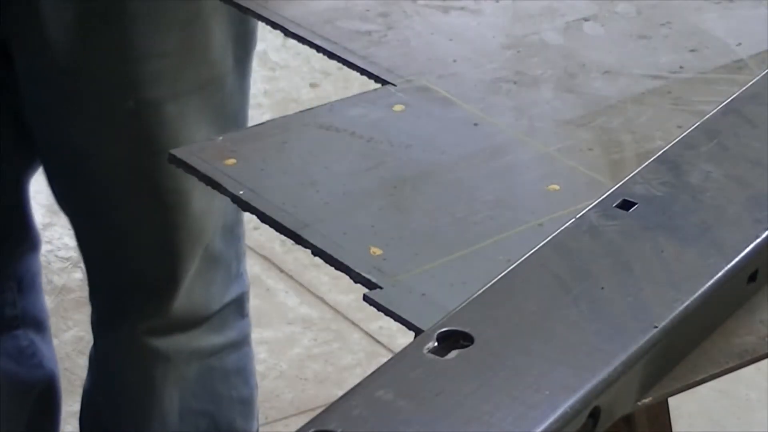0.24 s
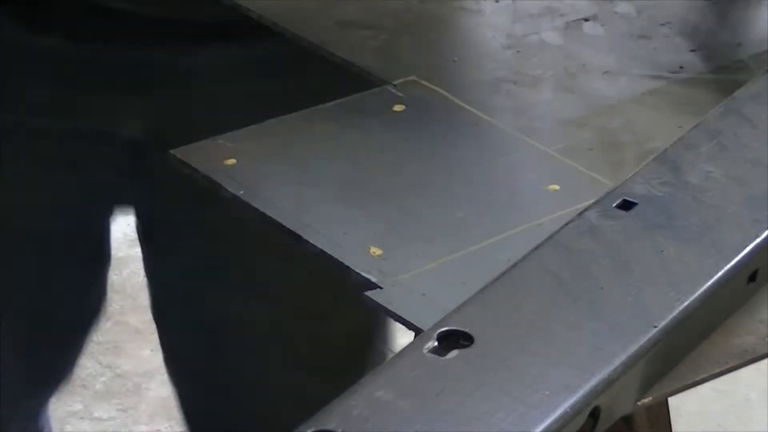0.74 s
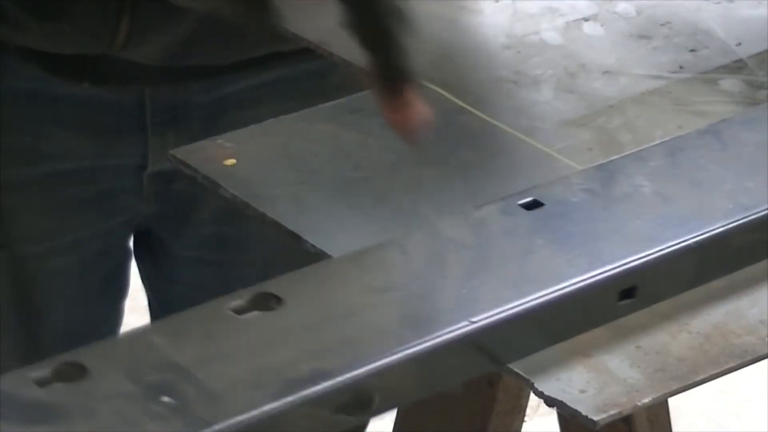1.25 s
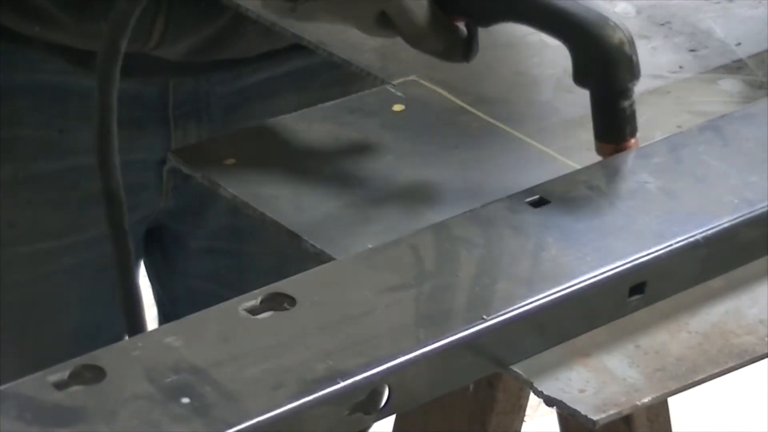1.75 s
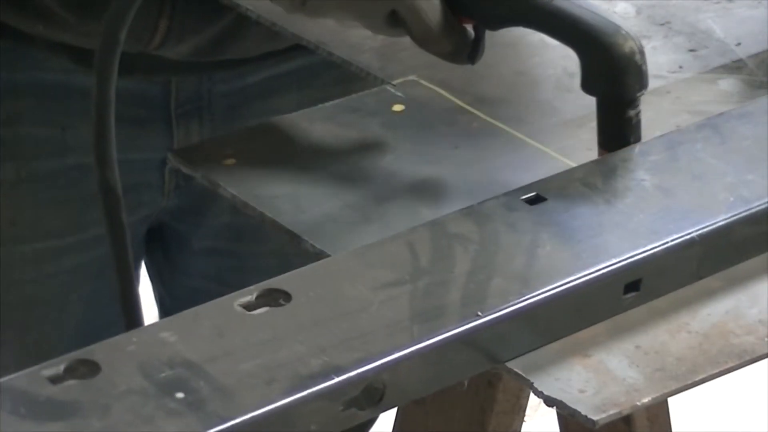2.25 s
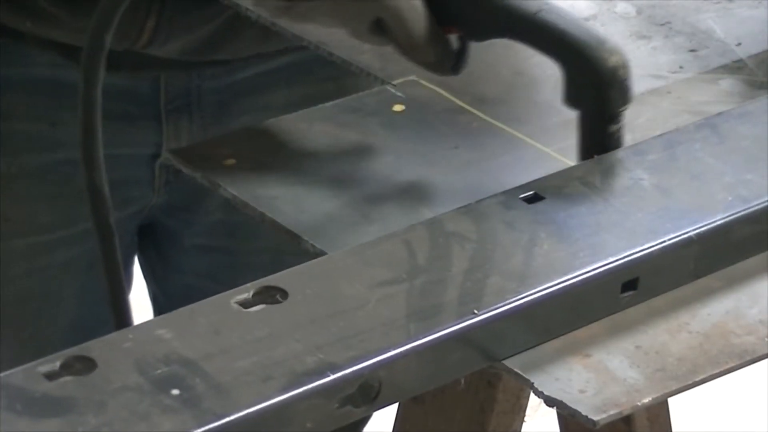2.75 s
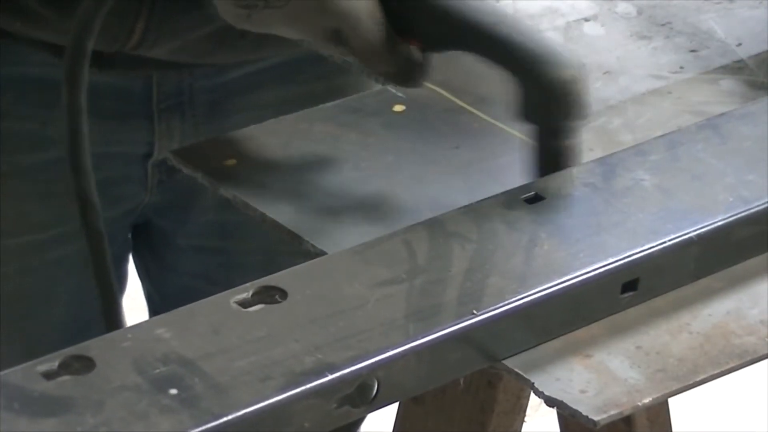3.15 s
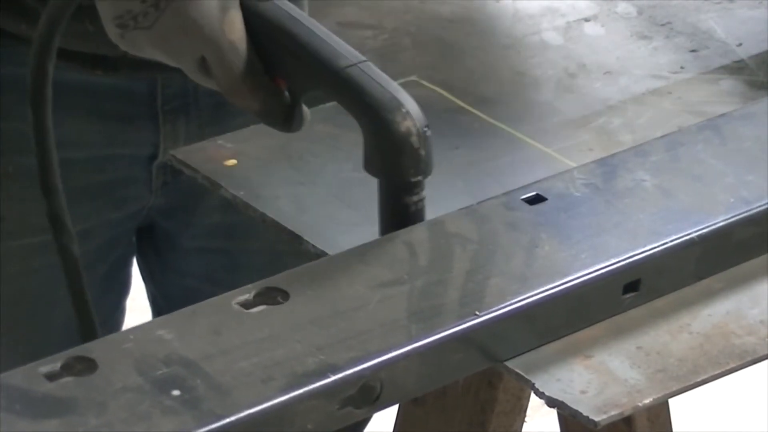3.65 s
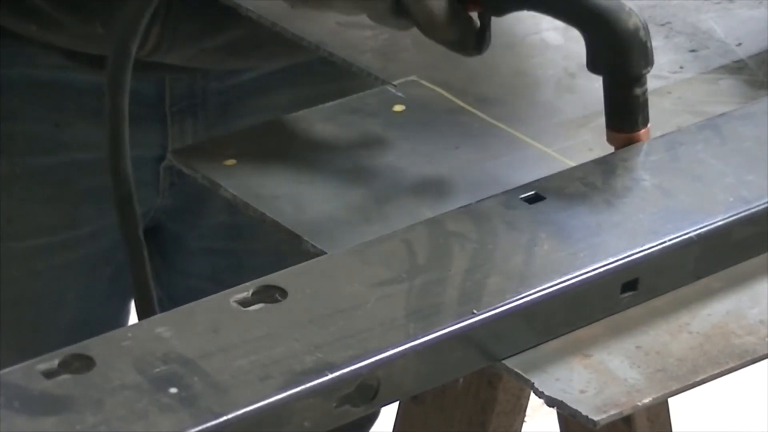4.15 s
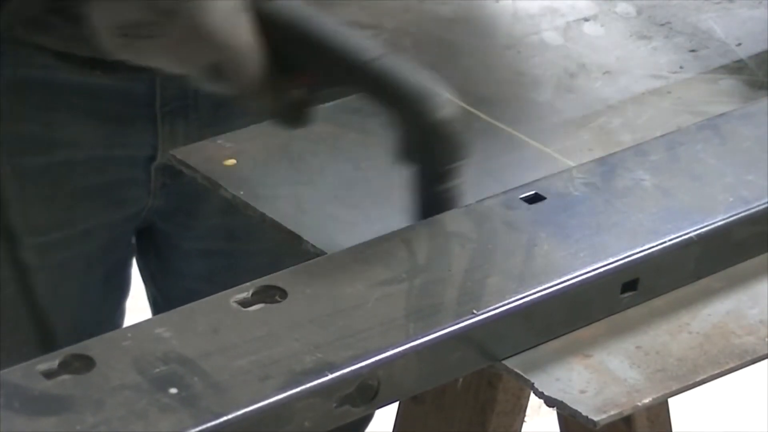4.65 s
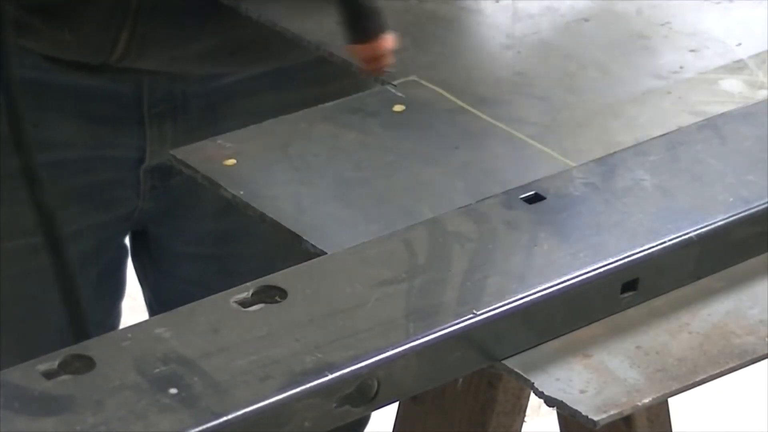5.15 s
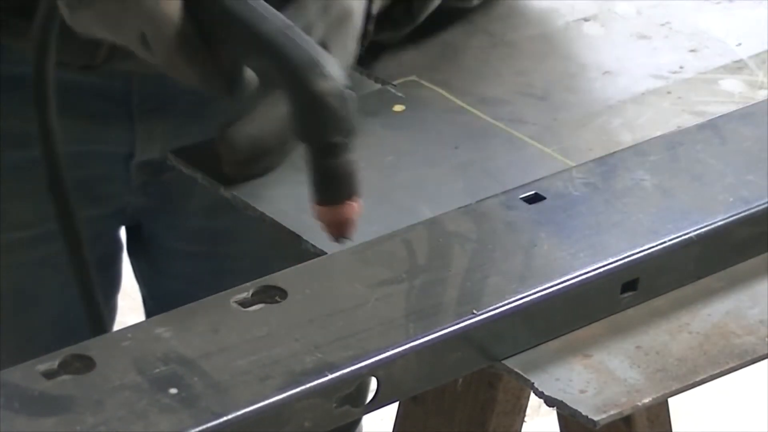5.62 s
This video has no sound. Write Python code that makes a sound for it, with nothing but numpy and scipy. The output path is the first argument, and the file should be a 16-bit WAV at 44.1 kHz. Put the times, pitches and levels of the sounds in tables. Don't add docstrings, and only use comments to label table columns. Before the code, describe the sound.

A strong, steady air hiss from a torch nozzle fills the first four seconds, heard close, with a short workshop reverberation. A steel bar clanks and grinds into place early on; the tip taps and lightly rubs it later. The air valve closes with a dull thump and the hiss dies quickly. A gritty metallic scrape with short squeals follows, then a knock, a faint lingering ring and small glove and metal ticks.

```python
import sys
import numpy as np
from scipy import signal
from scipy.fft import rfft, irfft, next_fast_len
from scipy.io import wavfile
from scipy.ndimage import uniform_filter1d, map_coordinates

SR = 44100
rng = np.random.default_rng(int(sys.argv[2]) if len(sys.argv) > 2 else 0)


def store_wav(level_fs):
    pcm = np.round(np.clip(np.atleast_2d(level_fs), -1, 1) * 32767)
    wavfile.write(sys.argv[1], SR, pcm.T.astype(np.int16))


def undo_db(level):
    steps = np.asarray(level, float) / 20
    return 10 ** steps


N = 259308
TIME_S = np.arange(N) / SR


def unit(x):
    return x / np.sqrt(np.mean(x ** 2) + 1e-20)


def along(points, hz):
    f, v = np.transpose(points)
    return np.interp(np.log(hz + 1), np.log(f + 1), v)


def gains(rows, before=-120):
    s, *columns = np.transpose(rows)
    return [undo_db(np.interp(TIME_S, s, db, before, -120)) for db in columns]


def swells(rows):
    return sum(undo_db(db - 20 * np.maximum((s - TIME_S) / rise, (TIME_S - s) / fall))
               for s, db, rise, fall in rows)


def wobble(rate):
    knots = rng.standard_normal(int(N * rate / SR) + 4)
    return map_coordinates(knots, [np.arange(N) * rate / SR])


def filtered(x, response):
    m = next_fast_len(N + SR // 2)
    return irfft(rfft(x, m) * response(np.fft.rfftfreq(m, 1 / SR)), m)[..., :N]


def resonance(f, centre, width, db):
    return undo_db(db) * 1j * f * width / (centre * centre - f * f + 1j * f * width)


def modes(table):
    return lambda f: sum((-1) ** k * resonance(f, *mode) for k, mode in enumerate(table))


def wavering(table, swell_db, rate):
    total = 0
    for hz, width, db in table:
        level = np.sqrt(width) * undo_db(db + swell_db * wobble(rate))
        total = total + level * np.sin(2 * np.pi * hz * TIME_S + 0.94 * wobble(width))
    return unit(total)


# (time [s], echo delay [ms], nearness to the microphone [dB])
TORCH_HEIGHT = [(0, 0.67, -1), (.9, 0.397, 0.5), (1.15, 0.3358, 1.5), (1.27, 0.21356, -1),
                (1.37, 0.1624, 1), (1.41, 0.112, 0), (1.5, .108, .7), (1.63, 0.105, .3),
                (1.84, 0.103, -1.5), (1.87, 0.081, -0.5), (2.65, 0.05237, 0.5), (3.19, 0.032, 0.5),
                (3.25, 0.08716, -0.5), (3.31, 0.06108, 0.5), (3.77, 0.05403, 0.5), (3.81, 0.09, 1),
                (3.845, 0.1097, 0.5), (3.88, 0.12139, 0.5), (3.97, 0.10989, 0), (4.25, 0.10157, -1)]


def delay_ms(t):
    s, ms, _ = np.transpose(TORCH_HEIGHT)
    return np.interp(t, s, np.maximum(ms, .02))


# (echo delay [ms], share [0-1])
IMAGE_SHARE = [(.06, 0), (.085, 0.19), (.12, .35), (.2, 0.6), (.35, .35), (.46, .05)]
ROUGHNESS_HZ = 26020


def rush(spectrum, alike, patchy_db, mirror=0):
    hz, t, z = signal.stft(rng.standard_normal((2, N)), SR, nperseg=512)
    field = uniform_filter1d(rng.standard_normal(z.shape[1:]), 5, 0)
    field = uniform_filter1d(field, 10, 1)
    late_ms = delay_ms(t)
    share = mirror * np.clip(np.interp(late_ms, *np.transpose(IMAGE_SHARE)), 0, 1)
    share = share * np.exp(-(hz[:, None] / ROUGHNESS_HZ) ** 2)
    comb = np.abs(1 + share * np.exp(2j * np.pi * hz[:, None] * late_ms / 1000))
    comb = comb / np.sqrt(1 + share ** 2)
    pair = signal.istft(z * comb * undo_db(patchy_db * unit(field)), nperseg=512)[1][:, :N]

    def mid_side(f):
        turn = np.arctan(undo_db(along(alike, f)))
        return undo_db(along(spectrum, f)) * [np.cos(turn), np.sin(turn)]

    mid, side = filtered(pair, mid_side)
    return unit(np.array([mid + side, mid - side]))


VALVE_SHUTS_S = 4.2324
VALVE_T60_S = (0.16, .12, 0.3852, 0.8596)

# (frequency [Hz], side minus mid [dB])
FAR_WIDTH = [(40, -8), (150, -11.5), (400, -20.5), (1000, -10.5), (4000, -6.5), (7500, -16), (10000, -34.5),
             (15000, -39)]
# (frequency [Hz], density [dB per Hz])
RUMBLE_SPECTRUM = [(65, -38.5), (110, -18.5), (226, -10), (338, -5), (400, -1.5), (509, -4.5), (560, -26.5),
                   (730, -60), (1230, -120)]
# (frequency [Hz], density [dB per Hz])
ROOM_SPECTRUM = [(380, -32), (650, -1.5), (723, -13), (804, -8), (1880, -13.5), (2040, -13.5), (9640, -25),
                 (12500, -29), (15600, -31)]
# (frequency [Hz], density [dB per Hz])
HUM_SPECTRUM = [(13, -36), (22, -15), (54, -1.5), (130, 1.5), (170, -22), (290, -120)]
# (time [s], level [dB])
ROOM_LEVEL = [(4.95, -63), (4.986, -63), (5.216, -64), (5.88, -63)]
# (peak time [s], level [dB], rise [s], fall [s per 20 dB])
STIR_SWELLS = [
    (0, -53, .1, .6),
    (.97, -41, .15, 1.1),
    (2.14, -52, .03, .2),
    (2.7, -52, .08, .6),
    (3.46, -52, .4, .5),
    (4.24, -51, .1, .6),
    (4.81, -46, .06, .2),
    (5.25, -64, .2, .5),
    (5.7, -57.5, .22, .3),
]
BENCH_BLOWN_DB, BENCH_STILL_DB = -61, -71


def shop():
    since_shut = np.maximum(TIME_S - VALVE_SHUTS_S, 0)
    blown = undo_db(BENCH_BLOWN_DB - 60 * since_shut / VALVE_T60_S[-1])
    stirred = undo_db(BENCH_STILL_DB) + blown + swells(STIR_SWELLS)
    rumble = stirred * undo_db(0.59 * wobble(30)) * rush(RUMBLE_SPECTRUM, FAR_WIDTH, patchy_db=3.0)
    air = gains(ROOM_LEVEL, before=-66.0)[0] * rush(ROOM_SPECTRUM, FAR_WIDTH, patchy_db=1.0)
    return rumble + air + undo_db(-70.5) * rush(HUM_SPECTRUM, FAR_WIDTH, patchy_db=3.0)


# (frequency [Hz], t60 [s])
WALL_T60 = [(150, 0.25), (1000, 0.59503), (4000, 0.43), (12000, 0.21)]


def walls(x):
    hz, t, z = signal.stft(rng.standard_normal((2, SR // 2)), SR, nperseg=256)
    tail = signal.istft(z * undo_db(-60 * t / along(WALL_T60, hz)[:, None]), SR, nperseg=256)[1]
    tail = tail[0] + np.array([[.06], [-.06]]) * tail[1]
    late = np.pad(x, (300, 0))[None]
    return signal.fftconvolve(late, tail / np.linalg.norm(tail[0]), axes=1)[:, :N]


BAR_HZ = (606, 753)

# (time [s], level [dB])
SINGING_LEVEL = [
    (4.85, -62),
    (5.0, -59.5),
    (5.25, -63),
    (5.5, -64.5),
    (5.62, -67),
    (5.88, -70.5),
]


def singing():
    return gains(SINGING_LEVEL)[0] * np.sqrt(2) * np.sin(2 * np.pi * BAR_HZ[0] * TIME_S)


# (time [s], peak [dB], frequency [Hz], t60 [s], rustle share [0-1])
SMALL_CONTACTS = [(4.752, -33, 4337, 0.0557, .8), (4.775, -41.5, 7180, 0.092, 0.32),
                  (4.85, -49, 10020, .015, .6), (5.17, -46, 2200, .03, 0.73), (5.209, -44, 1702, 0.053, .2),
                  (5.209, -46, 968.6, 0.04187, 0.27), (5.228, -53, 1947, 0.0403, 0.38),
                  (5.374, -58.5, 1850, 0.041, .5), (5.474, -43, 6548, 0.01198, 0.47),
                  (5.474, -46, 4186, .012, .9), (5.583, -49, 2380, 0.04163, .8),
                  (5.59, -57.5, 5000, 0.0565, .9), (5.6, -51, 3154, 0.05034, 0.68),
                  (5.605, -65, 6051, .15, .3), (5.671, -53, 1605, .033, 0.78), (5.858, -52, 1100, .05, .9),
                  (5.865, -45, 929.9, .08, 0.27), (5.862, -47, 1397, .09, .6),
                  (5.862, -50, 2314, 0.0694, 0.37)]


def ticks():
    out, t = np.zeros(N + SR), np.arange(SR // 8) / SR
    for s, db, hz, t60, rustle in SMALL_CONTACTS:
        drift = unit(uniform_filter1d(rng.standard_normal(len(t)), size=32))
        ring = np.sin(2 * np.pi * hz * t + 0.005 * np.cumsum(drift))
        band = signal.butter(4, [hz / 2, hz * 1.35], "bandpass", fs=SR, output="sos")
        noise = unit(signal.sosfilt(band, rng.standard_normal(len(t))))
        snap = (1 - rustle) * ring + rustle * noise
        decay = undo_db(db - 60 * t / max(t60, .003))
        out[round(s * SR):][:len(t)] += decay * snap * (1 - np.exp(-t * hz / 7))
    return out[:N]


# (time [s], thud [dB], clack [dB])
BLOWS = [
    (.914, -28.5, -19),
    (1.349, -58, -41),
    (2.119, -41, -28.5),
    (2.633, -39.5, -26.5),
    (4.221, -27.5, -38),
    (4.239, -40, -36),
    (4.328, -35, -18),
    (4.755, -44.5, -28.5),
    (4.77, -41.5, -26.5),
]
# (time [s], peak [dB], frequency [Hz], t60 [s])
BLOW_RINGS = [(4.218, -38.5, 110, 0.063), (.865, -36, 458, 0.17), (.914, -16, 751, 0.059),
              (1.17, -33, 606, 0.18), (1.349, -27.5, 2130, .09), (2.117, -23, 435.5, 0.07),
              (2.633, -31.5, 360, .06), (2.64, -32.5, 1360, 0.05), (2.632, -30, 820, 0.05),
              (4.221, -14.5, 228.62, 0.033686), (4.233, -19.5, 320, 0.023), (4.241, -24.5, 2795, 0.11),
              (4.265, -31.5, 430, .12), (4.336, -34, 1700, .12), (4.338, -32, 1200, .2),
              (4.326, -23, 880, 0.0451), (4.335, -31, 2073, 0.089904), (4, -36, 2293, 0.1033),
              (4.335, -28, 480, 0.08394), (2.13, -36, 350, 0.15), (2.165, -34.5, 440, .1),
              (2.14, -47.5, 105, .25), (2.125, -35.5, 770, .15), (4.755, -24, 2820, 0.074),
              (4.77, -23, 1150, 0.07284)]
SLAP, SLAP_HZ = (4.336, -19, .016, .014), 1450


def knocks():
    out, t = np.zeros(N + SR), np.arange(SR // 4) / SR
    dull = signal.butter(3, [110, 610], "bandpass", fs=SR, output="sos")
    bright = signal.butter(3, [800, 2370], "bandpass", fs=SR, output="sos")
    onset = 1 - np.exp(-t / 0.0056)
    for s, thud_db, clack_db in BLOWS:
        thud = unit(signal.sosfilt(dull, rng.standard_normal(len(t))))
        thud = undo_db(thud_db - 1.5 - 60 * t / 0.13) * thud
        clack = signal.sosfilt(bright, rng.standard_normal(len(t)))
        clack = undo_db(clack_db + 14 - 60 * t / 0.065) * clack
        out[round(s * SR):][:len(t)] += (thud + clack) * onset
    for s, db, hz, t60 in BLOW_RINGS:
        drift = unit(uniform_filter1d(rng.standard_normal(len(t)), size=48))
        waver = np.cumsum(drift) * 0.0003 * np.sqrt(hz)
        decay = undo_db(db + 3.0 - 60 * t / max(t60, .01))
        out[round(s * SR):][:len(t)] += decay * np.sin(2 * np.pi * hz * t + waver) * onset
    return out[:N] + swells([SLAP]) * np.sin(2 * np.pi * SLAP_HZ * TIME_S)


# (time [s], mode [Hz], level [dB])
SQUEAL_MODES = [
    (4.48, 2600, -39),
    (4.521, 2600, -26.5),
    (4.58, 2600, -35),
    (4.635, 2600, -29.5),
    (4.66, 2290, -42),
    (4.7, 2290, -29),
    (4.75, 2290, -39.5),
    (4.8, 2290, -31.5),
    (4.87, 2290, -37.5),
    (4.92, 2290, -61),
]


def squeal():
    s, hz, db = np.transpose(SQUEAL_MODES)
    mode_hz = hz[np.clip(np.searchsorted(s, TIME_S), 0, len(s) - 1)]
    level = gains(np.transpose([s, db]))[0] * undo_db(-12 + 2.5 * wobble(70))
    return level * np.sin(2 * np.pi * np.cumsum(mode_hz) / SR + .9 * wobble(55))


# (peak time [s], level [dB],
# frequency [Hz], peak to 20 dB down [s])
MODE_CATCHES = [(3.36, -40.5, 2276, -0.0069), (3.45, -41.5, 1359, -0.0278), (3.505, -40, 2290, 0.0521),
                (3.6, -41, 1360, 0.0859), (3.69, -39.5, 1218, 0.1322), (3.75, -43, 1159, -0.0933),
                (3.8, -38.5, 1370, 0.0622), (3.87, -34.5, 2678, 0.051), (3.89, -33, 2089, 0.0251),
                (3.9, -41, 1676, -0.0133), (4.46, -51, 3862, 0.0565), (4.49, -57.5, 8480, 0.0126),
                (4.53, -48, 5660, 0.0706), (4.61, -49.5, 5662, 0.0418), (4.55, -52.5, 4169, 0.0651),
                (4.55, -51.5, 7200, 0.0508), (4.78, -53, 4170, 0.0504), (4.8, -55.5, 5820, 0.0405),
                (.93, -27.5, 1376, 0.0439), (.95, -29, 1019, 0.037), (.937, -28, 2600, .02),
                (.925, -30, 3690, .02), (1.09, -31, 1565, .04), (1.1, -32, 1290, .05),
                (.96, -31, 1560, .04), (.93, -32, 3490, 0.0015), (.97, -33.5, 2780, 0.0008),
                (.99, -31, 1330, 0.0506)]


def catches():
    total = 0
    for s, db, hz, span in MODE_CATCHES:
        level = undo_db(db - 20 * ((TIME_S - s) / span) ** 2 + 2.5 * wobble(90))
        total = total + level * np.sin(2 * np.pi * hz * TIME_S + .9 * wobble(60))
    return total


# (peak time [s], level [dB], rise [s], fall [s per 20 dB])
RAIL_SWELLS = [
    (4.39, -34, 0.073, 0.0639),
    (4.782, -26.5, 0.03189, 0.0859),
]
DRAG_START_S, DRAG_ATTACK_S, DRAG_END_S, DRAG_DB = 4.44, .085, 4.74, -33.5
SAG_DB_PER_S = 17.5
RAIL_T60_S, EDGE_T60_S = 0.467, 0.16
EDGE_DB, EDGE_JERK_DB = -3.5, -11


def drags():
    sag = SAG_DB_PER_S * np.maximum(TIME_S - DRAG_START_S - DRAG_ATTACK_S, 0)
    stroke = undo_db(DRAG_DB - sag) * np.clip((TIME_S - DRAG_START_S) / DRAG_ATTACK_S, 0, 1)
    since_end = np.maximum(TIME_S - DRAG_END_S, 0)
    low = stroke * undo_db(-60 * since_end / RAIL_T60_S) + swells(RAIL_SWELLS)
    high = undo_db(EDGE_DB) * stroke * undo_db(-60 * since_end / EDGE_T60_S)
    return low, high + undo_db(EDGE_JERK_DB) * swells(RAIL_SWELLS[1:])


# (frequency [Hz], width [Hz], level [dB])
RAIL_MODES = [(460.34, 110, -1), (1152.3, 52, -8.5), (1370, 15, 2), (1635.9, 40, 5), (1770, 42, -5),
              (1999, 15, -10), (2150, 48, -7), (2302.9, 66, 8), (2590, 50, -3), (2890, 27, -3),
              (2792, 19, -5.5)]
# (frequency [Hz], width [Hz], level [dB])
EDGE_MODES = [(3466.3, 52, 0), (4170, 60, -0.5), (4469.5, 44, -7), (5500, 60, -14), (5650, 37, 0),
              (6324, 31.1, -15.5), (6670, 100, -8.5), (7190, 37, -1), (7400, 40, -2.5), (7585, 18, -6),
              (7908, 18, -5), (8243, 37, -11.5), (8480, 29, -19.5), (9070, 41, -21)]
# (frequency [Hz], width [Hz], level [dB])
GUIDE_MODES = [(1250, 200, -2), (1640, 120, -10), (2160, 43, 0.5)]
# (frequency [Hz], density [dB per Hz])
RAIL_RUB = [(88, -55), (150, -27.5), (467, 2.5), (792, -1.5), (1140, -1), (2010, -2), (2300, -4.5),
            (3800, -28.5), (4940, -38), (8360, -120)]
# (frequency [Hz], density [dB per Hz])
EDGE_RUB = [(1760, -29), (3000, -0.5), (3920, -13), (4320, -9.5), (4850, -12), (7330, -14.5), (10000, -25),
            (12500, -36), (15500, -48)]
# (time [s], level [dB])
TRACE_LEVEL = [
    (3.25, -55.5),
    (3.45, -39),
    (3.6, -39),
    (3.75, -41.5),
    (3.9, -42),
    (4.02, -53),
]


def drag():
    low, high = drags()
    grit = rng.standard_normal(N) * undo_db(0.66 * wobble(70) + 2.2 * wobble(400))
    rail_rub = unit(filtered(grit, lambda f: undo_db(along(RAIL_RUB, f))))
    edge_rub = unit(filtered(grit, lambda f: undo_db(along(EDGE_RUB, f))))
    rail = .45 * wavering(RAIL_MODES, swell_db=4, rate=22) + rail_rub
    edge = .6 * wavering(EDGE_MODES, swell_db=4.5, rate=25) + edge_rub
    trace = gains(TRACE_LEVEL)[0] * unit(filtered(grit, modes(GUIDE_MODES)))
    return undo_db(-3) * low * rail + undo_db(-5.0) * high * edge + trace + squeal() + catches()


# (time [s], push [dB], lean toward the first mode [dB])
SHOVE_PUSH = [
    (0.907, -37.5, -13.5),
    (.945, -17, -22),
    (.96, -17, -14),
    (0.978, -17.5, -0.5),
    (1.013, -15.5, 6),
    (1.024, -33.5, 2),
    (1.037, -15, 11.5),
    (1.085, -26, -10),
    (1.114, -26, 0.5),
    (1.135, -45, 6),
]
SHOVE_T60_S = .2


def shove():
    s, db, lean = np.transpose(SHOVE_PUSH)
    push = np.interp(TIME_S, s, db, -120) - 60 * np.maximum(TIME_S - s[-1], 0) / SHOVE_T60_S
    return push, np.interp(TIME_S, s, lean)


# (peak time [s], level [dB], rise [s], fall [s per 20 dB])
JOLT_SWELL = [
    (.93, -21, .015, 0.082),
]
# (frequency [Hz], width [Hz], level [dB])
MIDDLE_MODES = [(936.63, 20, -4.5), (1025.1, 32, -0.5), (1170, 18, -10.5), (1285.7, 20, -1),
                (1376, 38, -2.5), (1527.2, 21, -13.5), (1567, 24, -3)]
# (frequency [Hz], width [Hz], level [dB])
UPPER_MODES = [(1885.5, 20, -9.5), (2099.5, 30, -5.5), (2210, 29, -1.5), (2330, 16, -9), (2455, 26, -8),
               (2600, 40, -4), (2780, 29, -2), (3010, 22, -6), (3270, 19, -5), (3490, 32, -3),
               (3690, 50, -9)]
# (frequency [Hz], level [dB], t60 [s])
FREE_MODES = [(821.53, -2, 0.4944), (953, -4, 0.5802), (1053, -11, 0.599), (1320, -7, 0.634),
              (1405, -5.5, 0.2663), (1755, -7, 0.337), (2017.3, -10, .27), (2290, -8, 0.5747),
              (2780, -11.5, 0.494), (3018.3, -2, 0.266), (3277, -15.5, .45), (3494, -13.5, 0.4676),
              (3667, -16, 0.302), (4172, -17, 0.2416)]
RELEASED_S, RELEASED_DB = 4.757, -33.5
RATTLE_FOLLOWS, MIDDLE_DB, UPPER_DB = 0.62, -13.5, -17.5
DULLS_DB_PER_S = 75.5


def bar():
    push, lean = shove()
    first, second = undo_db(push + np.minimum(lean, 0)), undo_db(push - np.maximum(lean, 0))
    jolt = swells(JOLT_SWELL)
    middle = undo_db(RATTLE_FOLLOWS * push + MIDDLE_DB) + jolt
    upper = undo_db(RATTLE_FOLLOWS * push + UPPER_DB) + jolt
    upper = upper * undo_db(-DULLS_DB_PER_S * np.maximum(TIME_S - JOLT_SWELL[0][0], 0))
    low, high = (np.sqrt(2) * np.sin(2 * np.pi * hz * TIME_S + .7 * wobble(40)) for hz in BAR_HZ)
    grind = rng.standard_normal(N) * undo_db(3 * wobble(90))
    grind = filtered(grind, lambda f: modes([(1100, 2200, 0)])(f) ** 2)
    chatter = rng.standard_normal(N) * undo_db(2.8 * wobble(90))
    chatter = filtered(chatter, lambda f: modes([(2500, 2600, 0)])(f) ** 2)
    rattle = middle * (wavering(MIDDLE_MODES, swell_db=2.5, rate=30) + .5 * unit(grind))
    rattle = rattle + upper * (wavering(UPPER_MODES, swell_db=1.5, rate=32) + 0.29 * unit(chatter))
    since = np.maximum(TIME_S - RELEASED_S, 0)
    free = sum(undo_db(RELEASED_DB + db - 60 * since / t60) * np.sin(2 * np.pi * hz * since)
               for hz, db, t60 in FREE_MODES)
    free = free * (1 - np.exp(-since / 0.01028))
    return first * low + second * high + undo_db(-3.0) * rattle + free


# (crest frequency [Hz], level [dB])
WHISTLE_LEVEL = [(7000, -51), (8500, -26), (9500, -23), (10500, -32.5), (12500, -42), (15000, -55)]
WHISTLE_WIDTH = 0.075


def whistle():
    hz, t, z = signal.stft(rng.standard_normal(N), SR, nperseg=512)
    centre_hz = np.minimum(1000 / delay_ms(t), 19000)
    crest = np.exp(-.5 * ((hz[:, None] / centre_hz - 1) / WHISTLE_WIDTH) ** 2)
    level = undo_db(along([(5000, -120)] + WHISTLE_LEVEL, centre_hz))
    crest = crest / np.sqrt(np.mean(crest ** 2, axis=0)) * level
    return signal.istft(z * crest, nperseg=512)[1][:N]


# (frequency [Hz], density [dB per Hz])
HISS_SPECTRUM = [(5000, -41.5), (7000, -6.5), (7700, -2), (8300, -0.5), (9300, 0), (10200, -4.5),
                 (11500, -16), (13000, -17)]
# (frequency [Hz], density [dB per Hz])
FIZZ_SPECTRUM = [(9000, -40.5), (10500, 1.5), (12000, 3.5), (13300, -2), (14000, -9.5), (15800, -11.5),
                 (16500, -29.5)]
# (frequency [Hz], density [dB per Hz])
WASH_TRAPPED = [(1180, -36), (2000, -15), (3450, -3), (3720, -6), (4490, -1.5), (5030, -3), (5640, 0),
                (6390, -6), (7800, -9), (10100, -32), (17200, -120)]
# (frequency [Hz], density [dB per Hz])
WASH_SPREAD = [(1180, -27), (2000, -6), (2290, -8.5), (3170, 0), (3810, -4.5), (4390, -0.5), (5000, -1.5),
               (5610, 0.5), (7200, -5.5), (7800, 1.5), (10100, -31), (17200, -120)]
# (frequency [Hz], density [dB per Hz])
ROAR_SPECTRUM = [(210, -51.5), (350, -22.5), (546, -11.5), (604, -14), (688, -12.5), (943, -12.5),
                 (1380, -6.5), (2290, -5.5), (3200, -8.5), (4160, -24), (7040, -120)]
# (frequency [Hz], side minus mid [dB])
NEAR_WIDTH = [(60, -7), (250, -17), (500, -29.5), (1100, -39.5), (2500, -36.5), (3800, -19), (5000, -25),
              (8000, -18.5), (10500, -24.5), (14000, -19)]
# (time [s], side gain [dB])
TREBLE_WIDTH = [
    (0, 3),
    (.85, 3.5),
    (1.2, -4.5),
    (4.2, -5.5),
    (4.3, 10.5),
]
# (echo delay [ms], hiss [dB], fizz [dB], wash [dB], roar [dB])
HEIGHT_LEVELS = [(.045, -23.5, -40, -24, -36), (.08, -25, -27.5, -24, -35.5),
                 (0.106, -30.5, -28.5, -25.5, -37), (.114, -25, -32, -25.5, -34), (.2, -22, -29, -27, -33),
                 (.45, -25, -36, -26, -38.5)]
TRAPPED_MS, LEAST_TRAPPED = (.101, .107), 0.3
ROAR_SHOVE_DB, ROAR_TRACE_DB = -8.5, 2
GASP_RISE_S, GASP_WASH_DB, GASP_ROAR_DB = 0.018, 3.3, 11.075


def jet():
    height = delay_ms(TIME_S)
    landed = np.clip(np.interp(height, TRAPPED_MS, [1, LEAST_TRAPPED]), 0, 1)
    near_db = np.interp(TIME_S, *np.transpose(TORCH_HEIGHT)[::2])
    ms, *levels = np.transpose(HEIGHT_LEVELS)
    held = [undo_db(near_db + np.interp(height, ms, db)) for db in levels]
    since_shut = np.maximum(TIME_S - VALVE_SHUTS_S, 0)
    hiss, fizz, wash, roar = (g * undo_db(-60 * since_shut / t60) for g, t60 in zip(held, VALVE_T60_S))
    gasp = np.clip((TIME_S - VALVE_SHUTS_S) / GASP_RISE_S + 1, 0, 1)
    wash, roar = wash * undo_db(GASP_WASH_DB * gasp), roar * undo_db(GASP_ROAR_DB * gasp)
    roar = roar + undo_db(shove()[0] + ROAR_SHOVE_DB) + undo_db(ROAR_TRACE_DB) * gains(TRACE_LEVEL)[0]

    spread = np.sqrt(1 - landed) * rush(WASH_SPREAD, NEAR_WIDTH, patchy_db=1.5, mirror=.65)
    trapped = np.sqrt(landed) * rush(WASH_TRAPPED, NEAR_WIDTH, patchy_db=0.2985, mirror=0.85)
    flutter = undo_db(0.18 * wobble(6.34) + 0.29 * wobble(40))
    nozzle = hiss * rush(HISS_SPECTRUM, NEAR_WIDTH, patchy_db=0.5723, mirror=0.9772)
    nozzle = nozzle + fizz * rush(FIZZ_SPECTRUM, NEAR_WIDTH, patchy_db=0.95, mirror=0.91)
    nozzle = filtered(nozzle, lambda f: f * f / (f * f + 400 ** 2))
    treble = nozzle + .5 * wash * spread
    centre = treble.mean(0)
    treble = centre + undo_db(np.interp(TIME_S, *np.transpose(TREBLE_WIDTH))) * (treble - centre)
    blast = treble + .5 * wash * spread + wash * trapped
    blast = blast + hiss / held[0] * whistle()
    blast = blast + roar * rush(ROAR_SPECTRUM, NEAR_WIDTH, patchy_db=1.1095)
    return flutter * filtered(blast, lambda f: f * f / (f * f + 150 ** 2))


# (frequency [Hz], side minus mid [dB])
STEEL_LEFTWARD = [(100, -12), (300, -20), (700, -27), (1300, -34), (2500, -22), (6000, -20), (10000, -34)]


def scene():
    air, hits, guide, scrape, small = jet(), knocks(), bar(), drag(), ticks()
    distant = undo_db(-11.5) * air.mean(0) + undo_db(-2.5) * hits + undo_db(-4.5) * scrape + undo_db(-6.0) * small
    ringing = undo_db(-15) * guide
    steel = hits + guide + scrape + small
    side = filtered(steel + 1.5 * scrape, lambda f: 1j * undo_db(along(STEEL_LEFTWARD, f)))
    direct = undo_db(-1.0) * air + np.array([steel + side, steel - side])
    return direct + walls(distant + ringing) + singing() + shop()


def top_cut(x):
    return signal.sosfilt(signal.butter(12, 15710, fs=SR, output="sos"), x)


SHADOW_HZ, SHADOW_WIDTH_HZ, SHADOW_DEPTH = 7590, 330, 0.35
LEVELLER_DB, LEVELLER_SHARE, LEVELLER_MEMORY_S = -20.5, 0.54, 0.023


def record(dry):
    def shadow(f):
        return 1 - SHADOW_DEPTH * np.exp(-((f - SHADOW_HZ) / SHADOW_WIDTH_HZ) ** 2)

    shaded = filtered(dry, shadow)
    keep = np.exp(-1 / (LEVELLER_MEMORY_S * SR))
    power = signal.lfilter([1 - keep], [1, -keep], shaded.mean(0) ** 2)
    excess = np.maximum(power / undo_db(2 * LEVELLER_DB), 1)
    return top_cut(shaded * excess ** (-LEVELLER_SHARE / 2))


dry = scene()
out = record(dry)
store_wav(out)
```